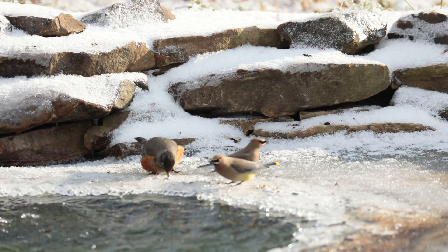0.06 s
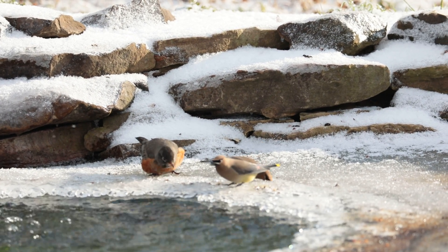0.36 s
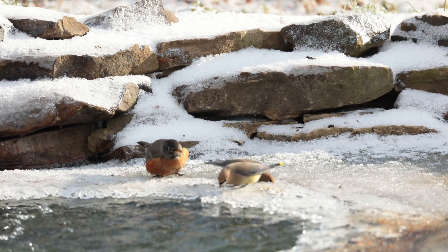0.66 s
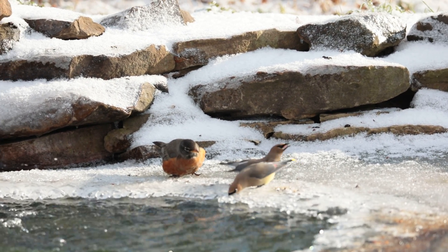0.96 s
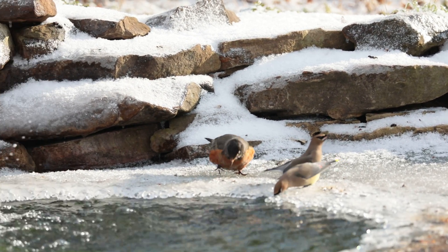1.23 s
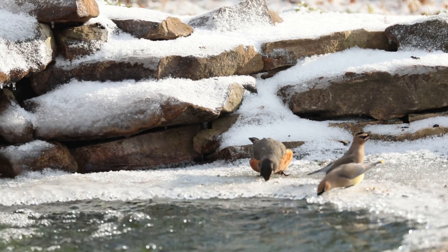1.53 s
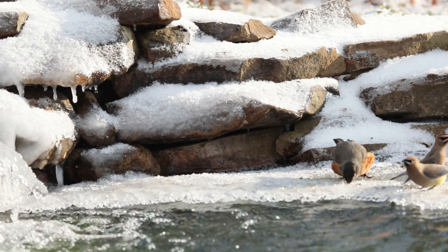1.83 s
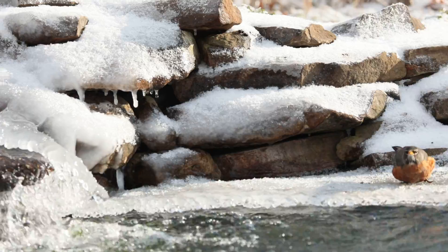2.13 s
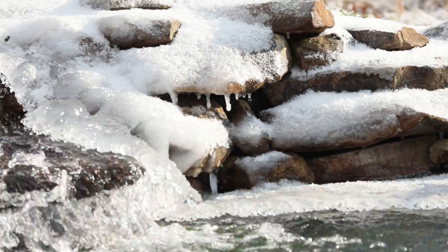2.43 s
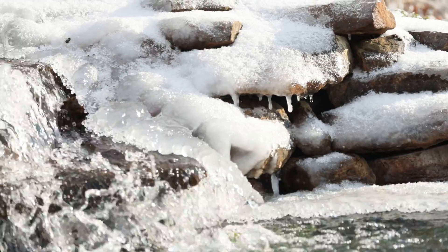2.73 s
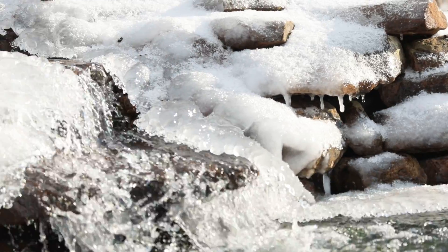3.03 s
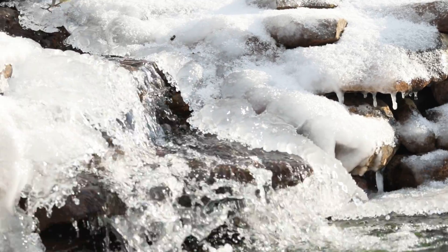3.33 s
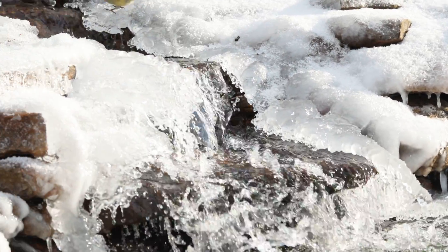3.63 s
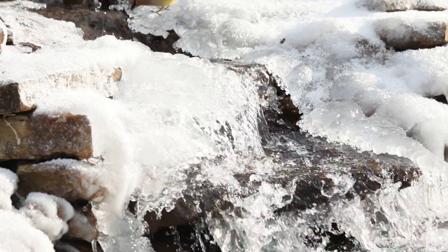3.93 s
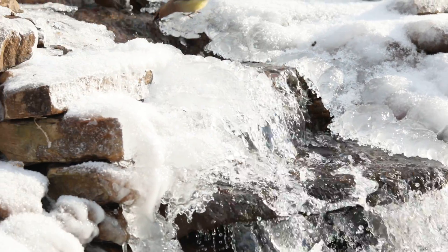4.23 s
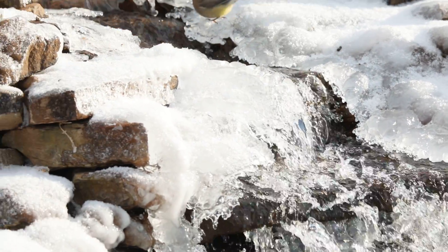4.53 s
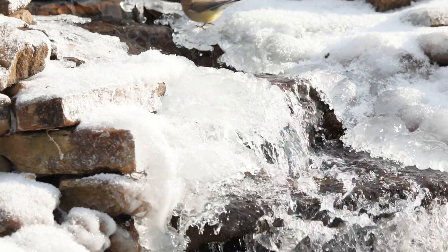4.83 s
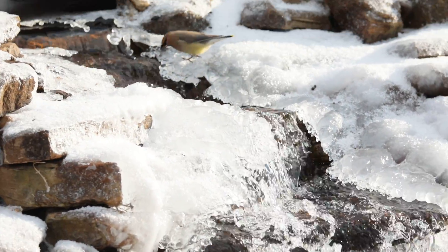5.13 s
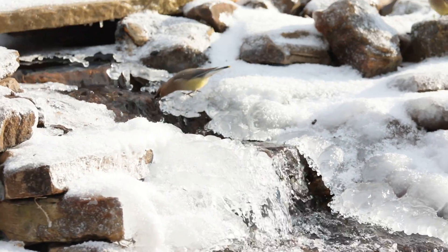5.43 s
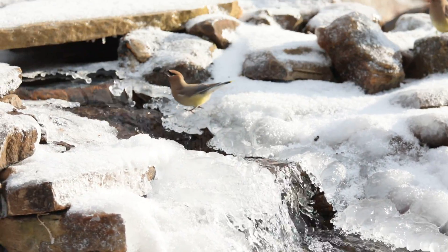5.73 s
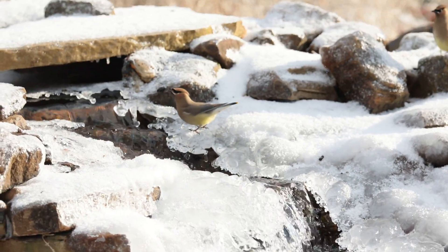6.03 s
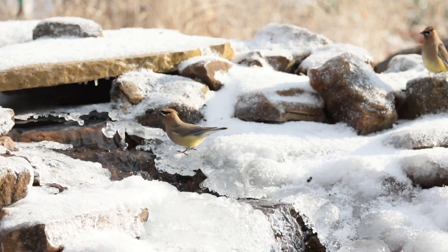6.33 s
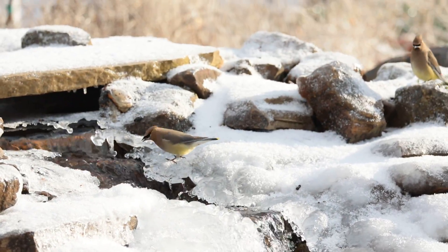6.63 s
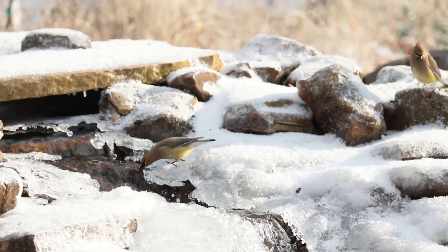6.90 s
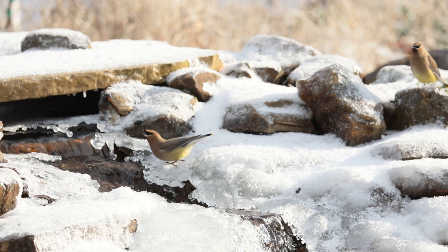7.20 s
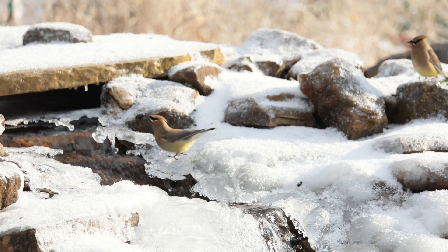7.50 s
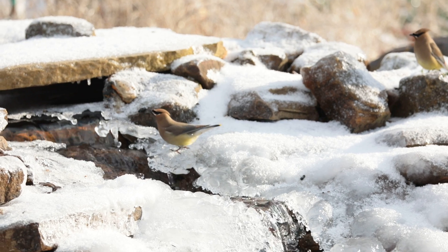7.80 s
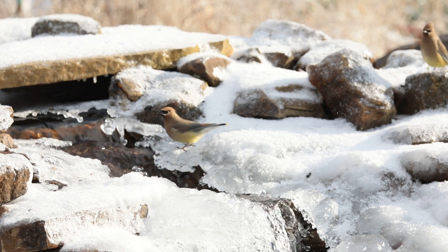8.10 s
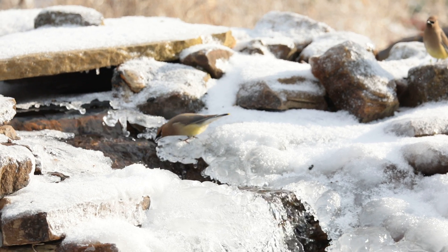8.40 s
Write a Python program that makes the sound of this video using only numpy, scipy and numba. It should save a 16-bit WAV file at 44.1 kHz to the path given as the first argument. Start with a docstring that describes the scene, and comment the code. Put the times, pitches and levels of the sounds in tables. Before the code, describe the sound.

Water bubbles continuously over rocks outdoors, while faint quick ticks and two thin bird trills come through later on.

```python
"""A small waterfall babbles over icy rocks into a garden pond: crowds of ringing bubbles in uneven
splashes, over a soft rush, crackling spray and a low rumble. Small birds whistle two thin, high
trills. Runs of faint, quick ticks sound close by, likely a lens motor, and near the end comes
one short, low groan, perhaps the camera mount rubbing."""
import sys
import numpy as np
from scipy import signal
from scipy.fft import rfft, irfft, next_fast_len
from scipy.io import wavfile
from scipy.ndimage import uniform_filter1d
from numba import njit

SR = 44100
rng = np.random.default_rng(int(sys.argv[2]) if len(sys.argv) > 2 else 0)


def wrap_up_sound(samples):
    """Save the sound to the file named by the first command line argument, as 16-bit audio."""
    columns = np.atleast_2d(samples).T
    # keep every value between -1 and 1, then stretch to whole-number steps
    tamed = np.clip(columns, -1, 1)
    steps = np.round(tamed * 32767).astype(np.int16)
    wavfile.write(sys.argv[1], SR, steps)


N = 381906
T = np.arange(N) / SR


def waterfall(slosh):
    """Small bubbles come in bursts as lumps of water land, over the smooth rush of the stream."""
    # The fall eases a little as the microphone turns past it. Each row: time in seconds, level in dB.
    fader = [(0, -27), (2.7, -27), (3.1, -27.5), (4.4, -28), (5.4, -27.5), (5.9, -27), (8.66, -27.5)]
    # Big lumps land and the fall surges for a moment. Each row: time in seconds, boost in dB.
    splashes = [(.17, 3.5), (.659, 3), (.882, 0.5), (1.282, 2.5), (1.911, 4.5), (2.537, 4.5), (2.708, 1.5),
                (3.907, 5), (4.768, 0), (5.958, 2.5), (7.39, 3.5), (8.519, 3)]
    # The fall's midrange voice. Each row: frequency in Hz, gain in dB.
    fall_eq = [(700, -30), (900, -15), (1120, -6.5), (1350, -5.5), (1700, 0), (1900, -6), (2130, -3),
               (2750, -8.5), (3020, -14.5), (3250, -11.5), (3550, -12.5), (4020, -11), (4700, -26),
               (6000, -40)]
    level_db, = in_time(fader)
    half_width_s = 0.013
    surge_db = sum(db * np.exp(-np.minimum(((T - s) / half_width_s) ** 2, 20)) for s, db in splashes)
    flow = from_db(.95 * slosh + 1.05 * drift(90))
    babble = bubble_crowd(flow * from_db(.8 * drift(40)), per_s=2300, low_hz=749, high_hz=2706,
                          spread_db=2.5, cycles=25.4, rise=.077)
    fizz = bubble_crowd(flow * from_db(.8 * drift(40)), per_s=3000, low_hz=2700, high_hz=5500,
                        spread_db=4, cycles=32, rise=.08)
    plinks = bubble_crowd(flow, per_s=100, low_hz=1000, high_hz=3300, spread_db=3.2, cycles=58, rise=.1)
    slaps = rms_one((rng.random(N) < 400 * flow / SR) * rng.standard_normal(N))
    rush = rng.standard_normal(N) * np.sqrt(flow)
    water = babble + from_db(2) * fizz + from_db(-6) * plinks + from_db(-1.5) * slaps + from_db(3) * rush
    return from_db(level_db + surge_db) * steady(colour(water, fall_eq))


def bubble_crowd(flow, per_s, low_hz, high_hz, spread_db, cycles, rise):
    """Bubbles of all sizes are born at random, more and stronger where the flow surges; rms 1."""
    starts = np.flatnonzero(rng.random(N) < per_s * flow / SR)
    pitch, life = rng.random((2, N))[:, starts]
    strength, sign = rng.standard_normal((2, N))[:, starts]
    hz = low_hz * (high_hz / low_hz) ** pitch
    height = np.sign(sign) * from_db(spread_db * np.minimum(strength, 2)) * np.sqrt(flow[starts]) * hz
    return rms_one(ring_bubbles(starts, 2 * np.pi * hz / SR, height, cycles * (.5 + life), rise, N))


@njit
def ring_bubbles(starts, phase_step, height, cycles, rise, n):
    """Each bubble is a dying sine whose pitch climbs as it nears the surface."""
    out = np.zeros(n)
    for b in range(len(starts)):
        life = int(cycles[b] * 2 * np.pi / phase_step[b])
        fade, level = np.exp(-5 / life), height[b]
        for i in range(min(life, n - starts[b])):
            out[starts[b] + i] += level * np.sin(phase_step[b] * i * (1 + rise * i / life / 2))
            level *= fade
    return out


def plops(slosh):
    """A lump of water traps one strong bubble, which rings for a few cycles, bending slightly up."""
    # The standout bubbles. Each row: start in seconds, level in dB, pitch in Hz, decay in cycles.
    accents = [(0.416, -12, 1600, 4), (0.533, -10.5, 1690, 4), (0.595, -26.5, 540, 10),
               (0.743, -23, 596, 4.1), (0.789, -14.5, 1390, 7), (0.874, -12, 2010, 7),
               (1.256, -27, 684, 12), (1.284, -10, 2070, 3), (1.487, -14.5, 1510, 4), (1.823, -18, 1690, 6),
               (1.907, -10.5, 1920, 3.7), (2.231, -26.5, 675, 13), (2.425, -17, 1830, 14),
               (2.586, -13, 1540, 5.2), (2.703, -11, 1710, 8.4), (2.9, -18, 2760, 12), (3.194, -27, 613, 8),
               (3.4, -12, 2450, 5.6), (3.709, -27.5, 523, 5.8), (3.984, -11.5, 1450, 4.4),
               (4.767, -6.5, 1500, 3), (4.767, -15, 3800, 7.2), (4.933, -11, 1580, 5),
               (5.276, -31, 290, 2.6), (5.448, -30, 259, 3), (5.94, -19, 2200, 5.4),
               (7.151, -14.5, 1740, 9), (7.424, -13.5, 2300, 7), (7.742, -10.5, 1750, 4)]
    out, t = np.zeros(N), T[:SR // 14]
    for s, level_db, hz, decay_cycles in accents + stray_plops(slosh):
        envelope = (1 - np.exp(-1.5 * t * hz)) * np.exp(-t * hz / decay_cycles)
        add(out, s, from_db(level_db) * envelope * np.sin(2 * np.pi * hz * t * (1 + t / 2)))
    return signal.sosfilt(signal.butter(6, 4400, fs=SR, output="sos"), out)


def stray_plops(slosh, per_s=9, centre_hz=1753):
    """Rows of random plops, likelier as the water surges and weaker far from the centre pitch."""
    born = rng.random(N) < per_s * from_db(2 * slosh) / SR
    octaves = 0.497 * np.clip(rng.standard_normal(N)[born], -2, 2)
    level_db = -15 - 6.5 * np.abs(octaves)
    decay_cycles = 4.4 * (.5 + rng.random(N)[born])
    return list(zip(T[born], level_db, centre_hz * 2 ** octaves, decay_cycles))


def pool(slosh):
    """Larger bubbles gurgle where the fall plunges in."""
    # The pool's hollow body. Each row: frequency in Hz, gain in dB.
    pool_eq = [(110, -8.5), (190, -12.5), (232, -3.5), (280, -5), (370, -14), (440, -9), (560, 0), (720, 0),
               (860, -3.5), (1100, -12), (2000, -61.5)]
    flow = from_db(slosh + 1.2 * drift(28))
    gurgle = bubble_crowd(flow, per_s=550, low_hz=169.4, high_hz=1108,
                          spread_db=4, cycles=18.3, rise=.072)
    glugs = bubble_crowd(flow, per_s=22, low_hz=500, high_hz=740, spread_db=2.5, cycles=36, rise=.1)
    wash = rng.standard_normal(N)
    return from_db(-39.5) * colour(gurgle + from_db(-11) * glugs + from_db(9) * wash, pool_eq)


def spray(slosh, pond_db=-47, stream_db=-49.5, spatters_per_s=4):
    """Droplets crackle on the rocks over a thin hiss; level and tone shift as the microphone turns."""
    # The microphone's aim. Each row: time in seconds, turn from 0 (pond) to 1 (upper stream).
    aim = [(0, 0), (1.8, 0), (2.6, .45), (3.6, .75), (5.5, 1), (8.66, 1)]
    # The sparkle facing the pond, and facing the stream. Each row: frequency in Hz, gain in dB.
    pond_eq = [(4500, -16), (6000, -11), (7300, -4.5), (8000, -4.5), (8600, -7), (9700, 1), (10350, -.5),
               (11100, -9), (11900, -14), (12900, -10), (13500, -13), (14300, -22), (15700, -26)]
    stream_eq = [(4500, -14), (6100, -9), (7000, -2), (8000, -1), (8500, -4), (9200, -2), (9800, -2),
                 (10600, 0), (11550, -2), (12250, -11), (13200, -7.5), (14100, -14), (15700, -21)]
    turn, = in_time(aim)
    level_db = (1 - turn) * pond_db + turn * stream_db
    landings = (rng.random(N) < 150 / SR) * np.minimum(rng.exponential(1, N), 2)
    flare = signal.lfilter([1], [1, -np.exp(-1 / (0.005 * SR))], landings)
    envelope = from_db(level_db) * rms_one((1 + .25 * flare) * from_db(.7 * slosh + .5 * drift(8)))
    # bright spatters on the rocks by the pond die in milliseconds
    spatter = from_db(-41.5) * np.exp(-T[:SR // 20] / 0.0037)
    for s in T[rng.random(N) < spatters_per_s * (1 - turn) / SR]:
        add(envelope, s, spatter)
    drops = (rng.random(N) < 4500 / SR) * rng.standard_normal(N)
    crackle = rms_one(drops) + from_db(-1.5) * rng.standard_normal(N)
    return envelope * ((1 - turn) * colour(crackle, pond_eq) + turn * colour(crackle, stream_eq))


def birds():
    """Each note of a trill is a tiny arched whistle, blurred by its echoes off the rocks."""
    # The two trills. Each row: note centre in seconds, pitch in Hz, peak level in dB.
    notes = [(7.202, 7280, -43), (7.224, 7680, -42), (7.241, 7330, -45), (7.262, 7690, -44),
             (7.278, 7300, -47), (8.370, 7520, -42), (8.391, 7320, -39), (8.412, 7560, -43),
             (8.451, 7660, -42), (8.488, 7720, -41), (8.520, 7470, -47)]
    out, arc = np.zeros(N), np.linspace(-1, 1, int(0.02 * SR))
    for s, hz, peak_db in notes:
        phase = 2 * np.pi * np.cumsum(hz * (1.004 - 0.093 * arc ** 2)) / SR
        note = from_db(peak_db) * np.cos(np.pi * arc / 2) ** 2 * np.sin(phase)
        start = s - len(arc) / SR / 2
        add(out, start, note)
        for echo_s in rng.uniform(.004, .035, size=3):
            add(out, start + echo_s, from_db(-12) * note)
    return out


def lens_ticks(step_s=1 / 30, attack_s=0.0015):
    """The stepping motor ticks: a few milliseconds of thin buzz with one main resonance."""
    # Runs of ticks. Each row: start and end in seconds, level in dB, pitch in Hz, motor steps per tick.
    runs = [(3.228, 3.40, -43, 7300, 1), (3.486, 3.70, -45, 7150, 1), (3.777, 3.83, -46, 7150, 1),
            (3.911, 4.16, -46, 7150, 1), (5.783, 5.95, -45, 8000, 1), (5.982, 6.42, -41.5, 8100, 1),
            (7.298, 7.58, -45, 7700, 2), (7.7688, 7.85, -45, 7800, 2), (7.963, 8.11, -44, 7800, 2),
            (8.333, 8.38, -40, 8000, 1)]
    out, t = np.zeros(N), T[:SR // 40]
    envelope = (t / attack_s) ** 2 * np.exp(2 - 2 * t / attack_s)
    for start, end, level_db, hz, steps in runs:
        for s in np.arange(start, end, steps * step_s):
            buzz = rng.standard_normal(len(t))
            main = rms_one(resonate_twice(buzz, hz, width_hz=1500))
            upper = rms_one(resonate_twice(buzz, hz * 1.3, width_hz=2200))
            add(out, s - .002, from_db(level_db) * envelope * (main + from_db(-5) * upper))
    return out


def groan():
    """A short, uneven stick-slip tone that sinks as the movement slows, with a faint high rustle."""
    # The groan's slide. Each row: time in seconds, pitch in Hz, level in dB.
    slide = [(8.300, 245.5, -62), (8.318, 240, -32), (8.335, 233, -28.5), (8.352, 221, -27),
             (8.366, 206, -28), (8.385, 190, -48)]
    # The airy rustle and the dull rub. Each row: frequency in Hz, gain in dB.
    rustle_eq = [(5000, -14), (7500, -3), (11000, 2), (13500, -4), (15700, -12)]
    rub_eq = [(60, -2), (120, -3), (300, 6), (480, -10)]
    hz, level_db = in_time(slide)
    phase = 2 * np.pi * np.cumsum(hz * (1 + 0.031 * drift(120))) / SR
    tone = np.sin(phase) + from_db(-22) * np.sin(2 * phase) + from_db(-12) * np.sin(3 * phase)
    rub = colour(rng.standard_normal(N), rub_eq)
    rustle = colour(rng.standard_normal(N), rustle_eq)
    gate = (T > slide[0][0]) & (T < slide[-1][0])
    return gate * from_db(level_db) * (tone + from_db(-9.5) * rub + from_db(-22) * rustle)


def rumble():
    """A bed of dull outdoor rumble with a wavering hum in it."""
    # The hum swells and fades. Each row: time in seconds, level in dB.
    swells = [(0, -51), (1.4, -53), (2.1, -62), (3.1, -52), (3.6, -49.5), (4.75, -48), (5.2, -54.5),
              (6.4, -54), (7.0, -49.5), (8.66, -49.3)]
    # The rumble's low end. Each row: frequency in Hz, gain in dB.
    rumble_eq = [(15, -22), (34, -4.5), (55, 6.5), (80, -5), (108, 7.5), (135, -4), (160, 3), (190, -23),
                 (400, -26)]
    hum_db, = in_time(swells)
    band = signal.hilbert(resonate_twice(rng.standard_normal(N), hz=73.3, width_hz=19.6))
    hum = rms_one(band.real / np.sqrt(np.abs(band) + 1e-12))  # 2:1 compression calms the wavering
    return from_db(-51) * colour(rng.standard_normal(N), rumble_eq) + from_db(hum_db) * hum


def from_db(db):
    """Decibels to gain."""
    return 10 ** (np.asarray(db) / 20)


def rms_one(x):
    """Scale to unit power."""
    return x / np.sqrt(np.mean(x ** 2) + 1e-20)


def steady(x):
    """The pump feeds a constant flow: over a fifth of a second the power evens out to 1."""
    return x / np.sqrt(uniform_filter1d(x ** 2, size=SR // 5) + 1e-20)


def in_time(rows):
    """Draw automation curves: each column after the time, at every sample."""
    s, *columns = np.transpose(rows)
    return [np.interp(T, s, c) for c in columns]


def add(out, s, sound):
    """Mix a sound in from time s."""
    i = max(0, int(s * SR))
    out[i:i + len(sound)] += sound[:max(0, N - i)]


def drift(corner_hz):
    """Smooth random modulation that rolls off above corner_hz; rms 1."""
    hop, warm_up = 40, 2000
    r = np.exp(-2 * np.pi * hop * corner_hz / SR)
    noise = rng.standard_normal(N // hop + warm_up + 2)
    slow = signal.lfilter([1], [1, -2 * r, r * r], noise)[warm_up:]
    return np.interp(np.arange(N) / hop, np.arange(len(slow)), rms_one(slow))


def colour(x, eq):
    """Minimum-phase EQ through (Hz, dB) points, rolling off past both ends; rms 1."""
    size = next_fast_len(N + SR // 10, True) // 2 * 2
    hz, db = np.transpose(eq)
    log_hz = np.log(np.maximum(np.fft.rfftfreq(size, 1 / SR), 1))
    beyond = np.abs(log_hz - np.clip(log_hz, np.log(hz[0]), np.log(hz[-1])))
    gain = from_db(np.interp(log_hz, np.log(hz), db) - 20 * beyond)
    cepstrum = irfft(np.log(gain))
    cepstrum[1:size // 2] *= 2  # folded forward, so nothing rings ahead of a hit
    cepstrum[size // 2 + 1:] = 0
    return rms_one(irfft(rfft(x, size) * np.exp(rfft(cepstrum)))[:N])


def resonate_twice(x, hz, width_hz):
    """Two passes through one resonance, each width_hz wide with gain 1 at the peak."""
    r = np.exp(-np.pi * width_hz / SR)
    b = np.array([1, 0, -1]) * (1 - r * r) / 2
    a = [1, -2 * r * np.cos(2 * np.pi * hz / SR), r * r]
    return signal.lfilter(b, a, signal.lfilter(b, a, x))


def scene():
    """The mono mix; one uneven slosh drives all the water sounds."""
    slosh = drift(24)
    water = waterfall(slosh) + pool(slosh) + spray(slosh) + plops(slosh)
    return (water + rumble() + birds() + lens_ticks() + groan())[None]


def record(dry):
    """A steep high cut takes off the very top."""
    cutoff_hz = 15700
    return signal.sosfilt(signal.ellip(12, .1, 80, cutoff_hz, fs=SR, output="sos"), dry)


dry = scene()
out = record(dry)
wrap_up_sound(out)
```